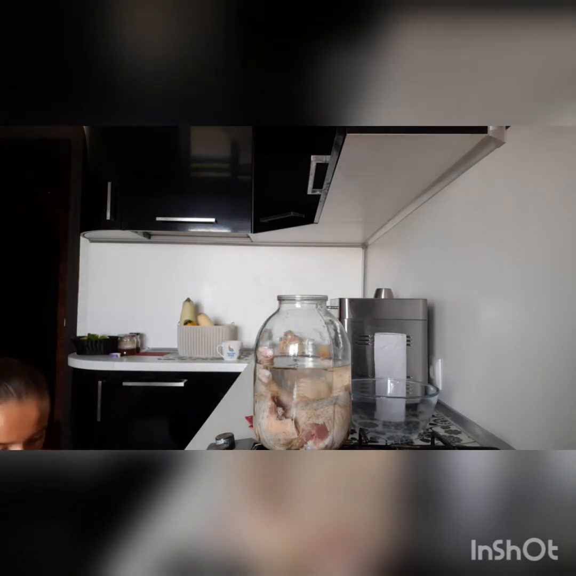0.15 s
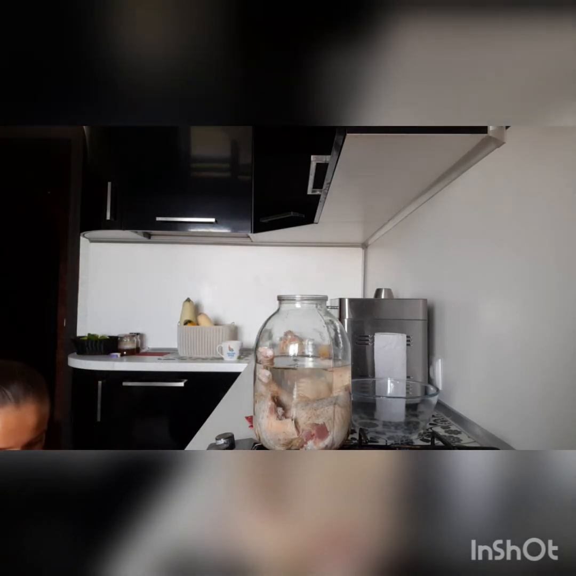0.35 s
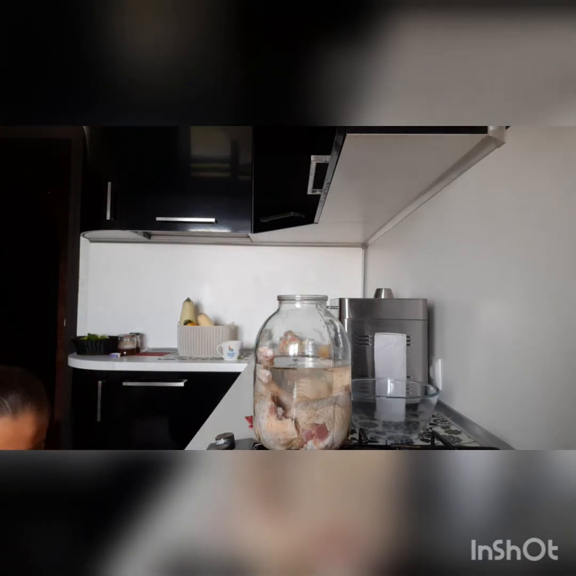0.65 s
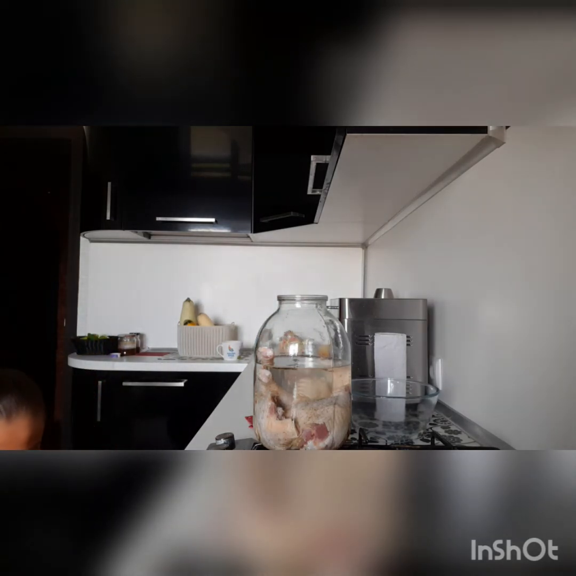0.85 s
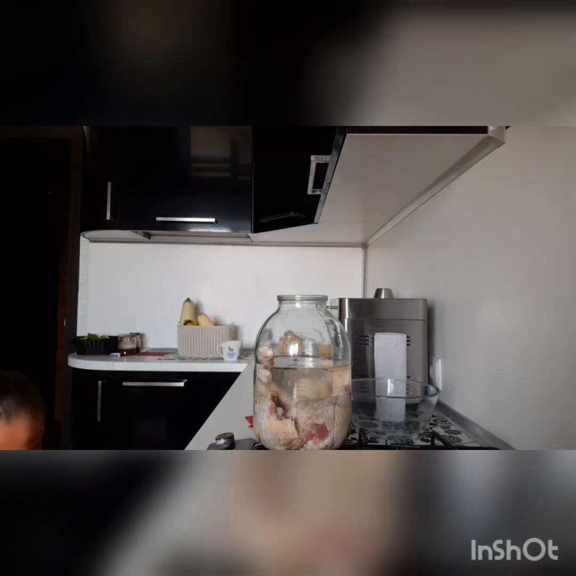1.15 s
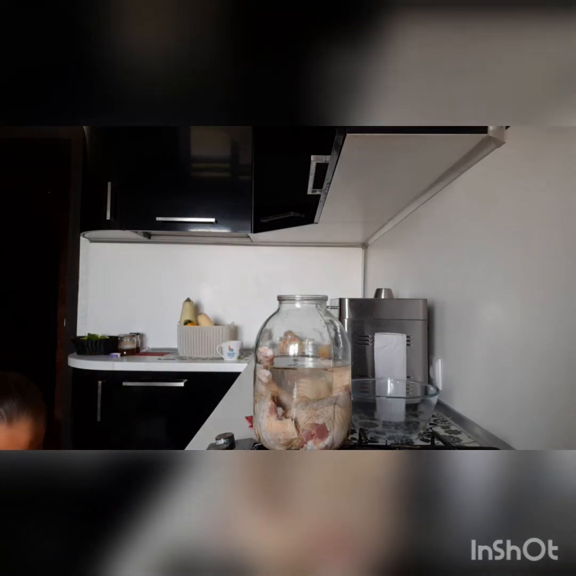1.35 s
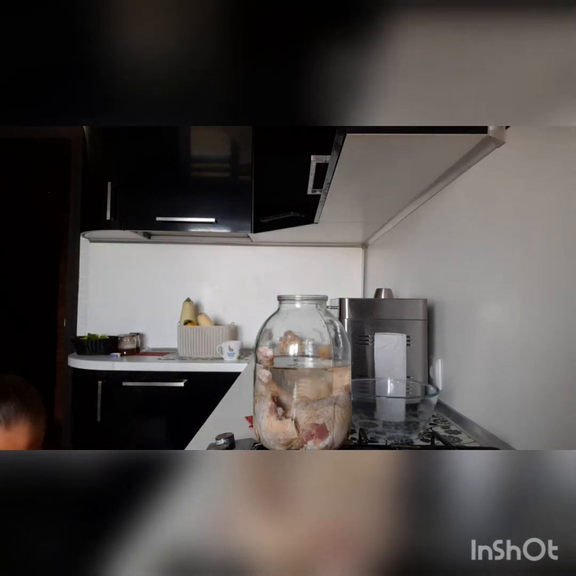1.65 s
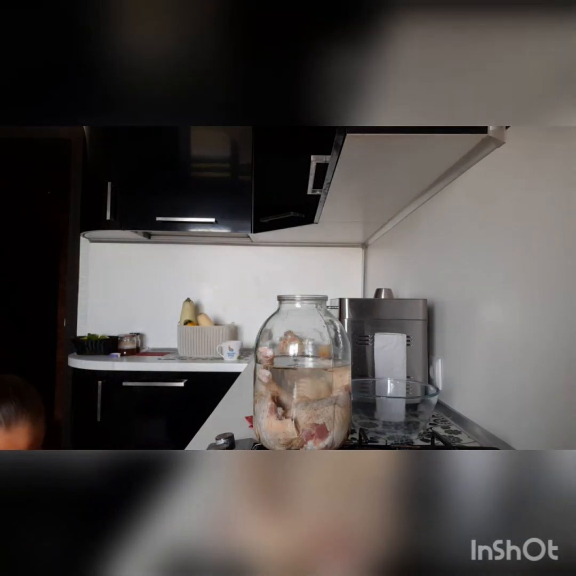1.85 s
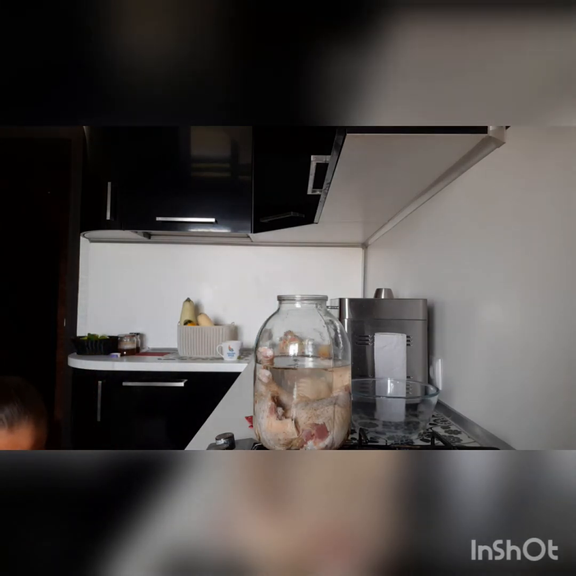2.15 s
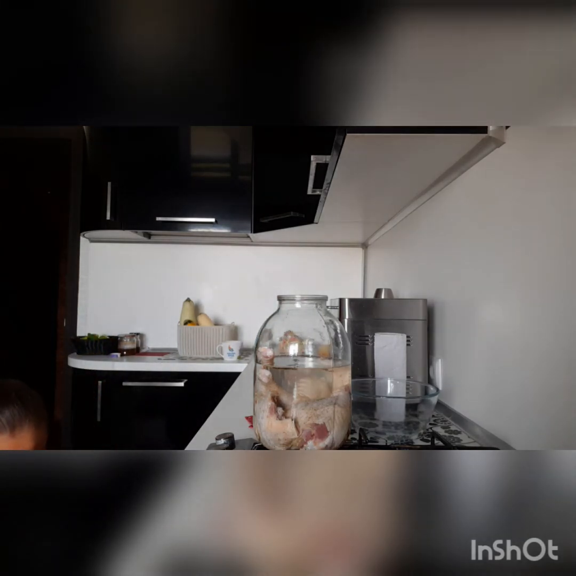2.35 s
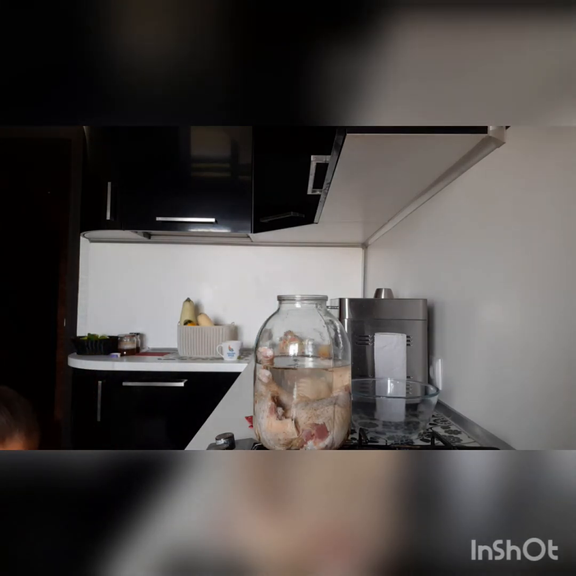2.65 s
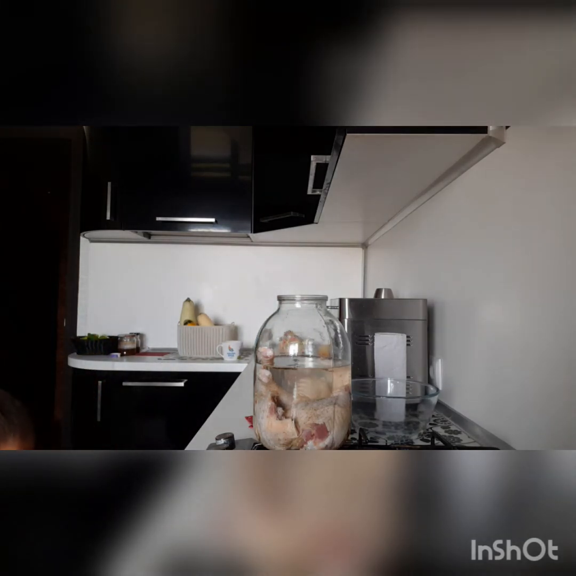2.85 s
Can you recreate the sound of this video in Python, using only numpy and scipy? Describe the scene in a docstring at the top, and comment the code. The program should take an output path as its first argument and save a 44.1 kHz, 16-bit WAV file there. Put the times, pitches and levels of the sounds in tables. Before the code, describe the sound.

A metal oven rack scrapes along its rails and clanks home inside a sheet-metal oven

```python
"""A small kitchen, heard from across the room on two microphones: a wire rack in a sheet-metal oven.
The rack is dragged along its rails, knocked and pushed home; friction ticks and clanks ring wires and panels.
Shaking and jolts boom in the casing, single tones sing out, and something brushes lightly.
Dense noise echoes give the room; banded noise, an appliance's mains hum and faint tones lie beneath."""
import sys
import numpy as np
from scipy import signal
from scipy.io import wavfile

SR = 44100
rng = np.random.default_rng(int(sys.argv[2]) if len(sys.argv) > 2 else 0)


def persist_wave(psi):
    """Save psi, clipped to +-1, as 16-bit WAV."""
    counts = np.round(np.clip(psi, -1, 1) * 32767).astype(np.int16)
    wavfile.write(sys.argv[1], SR, np.atleast_2d(counts).T)


def invert_db(level):
    """Linear amplitude ratio for a level in decibels (20 dB per decade), elementwise."""
    return 10 ** (np.asarray(level, dtype=float) / 20)


N = 132300

LEFT_BASS_DB, RIGHT_BASS_DB = -2.5, 0.57   # gain of the hum and the casing's boom on each side


def rms_one(x):
    """Scale to rms 1."""
    return x / np.sqrt(np.mean(x ** 2) + 1e-20)


def in_time(tables):
    """Join the strokes into sample-rate columns; the level rests between distant strokes."""
    rest_db, fade_s = -100, 0.03
    rows = []
    for table in tables:
        if rows and table[0][0] - rows[-1][0] > 2 * fade_s:
            rows.append((rows[-1][0] + fade_s, rest_db, *rows[-1][2:]))
            rows.append((table[0][0] - fade_s, rest_db, *table[0][2:]))
        rows += list(table)
    s, *columns = np.transpose(sorted(rows))
    return [np.interp(np.arange(N) / SR, s, c) for c in columns]


def at_hz(points, hz):
    """Read a spectrum table, evenly in log frequency."""
    table_hz, values = np.transpose(points)
    return np.interp(np.log(hz), np.log(table_hz), values)


def drift(rate):
    """Slow random wandering of spread 1, made at a twentieth of the sample rate; rate in Hz."""
    r = np.exp(-40 * np.pi * rate / SR)
    noise = rng.standard_normal(N // 20 + 4002)
    slow = signal.lfilter([1], [1, -2 * r, r * r], noise)[4000:]   # drop the filter's start
    return np.interp(np.arange(N) / 20, np.arange(len(slow)), rms_one(slow - slow.mean()))


def ring(force, hz, t60):
    """A damped resonance: a unit click sets a sine of height 1 ringing."""
    r, w = invert_db(-60 / (t60 * SR)), 2 * np.pi * hz / SR
    return signal.lfilter([0, np.sin(w)], [1, -2 * r * np.cos(w), r * r], force + 1e-18)


def driven(force, hz, t60):
    """A mode scaled so that white force of rms 1 gives rms 1."""
    return ring(force, hz, t60) * np.sqrt(4 * np.log(1000) / (t60 * SR))


def narrow(hz, width_hz):
    """Noise through one resonance, rms 1."""
    return rms_one(ring(rng.standard_normal(N), hz, np.log(1000) / (np.pi * width_hz)))


# Spectrum of the quiet kitchen. Each row: frequency in Hz, relative density in dB per Hz.
ROOM_SPECTRUM = [(30, -12), (70, -7), (103, -17), (140, -17.5), (227, -23), (300, -25.5), (420, -38),
                 (570, -30.5), (1070, -26.5), (1670, -31), (2100, -48), (4000, -54.5), (8000, -64.5),
                 (13000, -59.5), (16000, -45)]
# How alike the two microphones hear it. Each row: frequency in Hz, left-right correlation from -1 to 1.
ROOM_LIKENESS = [(60, 1), (250, 0.046), (600, 0.8), (1200, -0.54), (3000, -0.0073)]
# Faint fitful tones. Each row: frequency in Hz, width in Hz, middle level in dB.
FAINT_TONES = [(218, 45, -68), (282, 4.6, -74), (568, 41, -75), (1028, 65, -73.5), (1616, 25, -81)]


def room_tone():
    """Narrow bands of stereo noise, a wavering mains hum and faint tones that come and go."""
    air = 0
    edges = 28 * 2 ** np.arange(0, 9.3, 0.4)   # band edges in Hz
    white = rng.standard_normal((2, 2, N))     # neighbouring bands use different noise
    for k, (low, high) in enumerate(zip(edges, edges[1:])):
        band = signal.butter(2, [low, high], "band", fs=SR, output="sos")
        mid, side = signal.sosfilt(band, white[k % 2])
        hz = np.sqrt(low * high)
        alike = np.clip(at_hz(ROOM_LIKENESS, hz), -1, 1)
        stereo = np.sqrt(1 + alike) * mid + np.sqrt(1 - alike) * side * [[1], [-1]]
        air = air + invert_db(at_hz(ROOM_SPECTRUM, hz) + 1.5 * drift(6.2)) * stereo
    hum_level = np.sqrt(2) * invert_db(-52 + 1.8 * drift(4.9))
    hum = hum_level * np.sin(2 * np.pi * 100.3 * np.arange(N) / SR + 0.12 * drift(7.1))
    faint = sum(invert_db(db + 2.5 * drift(5)) * narrow(hz, w) for hz, w, db in FAINT_TONES)
    return invert_db(-56.5) * rms_one(air) + hum * invert_db([[LEFT_BASS_DB], [RIGHT_BASS_DB]]) + faint


def ticks():
    """Stick and slip: dense uneven ticks in judders, rms 1."""
    ticks_per_s, spread_db, judder_db, judder_hz = 1200, 4.0, 3.0, 45
    born = rng.random(N) < ticks_per_s / SR
    uneven_db = spread_db * np.minimum(rng.exponential(1, N), 5)
    sizes = invert_db(uneven_db + judder_db * drift(judder_hz))
    return rms_one(born * sizes * rng.choice([-1, 1], N))


# Modes of the oven's sheet panels. Each row: frequency in Hz, relative level in dB, t60 in s.
PANEL_MODES = [(392.6, 4.5, 0.39), (500.5, 4.5, 0.21), (565.3, 9, 0.14), (662, 9.5, 0.16), (759, 0.5, 0.15),
               (834.8, 10.5, 0.13)]
# Modes of the rack's wires. Each row: frequency in Hz, relative level in dB, t60 in s.
WIRE_MODES = [(1097, 8.5, 0.11), (1544, 7, .05), (2025, -4, 0.06), (2410, -3, 0.073), (3370, 2.5, 0.12),
              (3610, -7.5, 0.099), (4150, -3, 0.1), (4650, 0.5, 0.25), (5310, -6.5, 0.6), (5960, -3, 0.4),
              (7100, -13, 0.4), (11640, -2.5, 0.032)]
# Spectrum of the crowd of small modes. Each row: frequency in Hz, relative density in dB per Hz.
SMALL_MODES = [(320, -21.5), (450, -17.5), (700, 0), (980, -9), (1330, -11.5), (2500, -11.5), (4570, -9.5),
               (6500, -13.5), (8850, -17.5), (11600, -12.5), (14000, -19), (16000, -22.5)]


def rack_modes():
    """Named modes whose drive drifts as the contact shifts, then a crowd of small, short ones."""
    modes = []
    for hz, db, t60 in PANEL_MODES + WIRE_MODES:
        contact_shift_db = 3.0 * drift(6)[::32]
        modes.append((hz, db - 18.5 + contact_shift_db, t60))
    crowd = np.geomspace(330, 15800, num=90)
    crowd_db = at_hz(SMALL_MODES, crowd) + 10 * np.log10(crowd)   # spacing widens with frequency
    for hz, db in zip(crowd, crowd_db):
        modes.append((hz, -10 + db - crowd_db.max(), 0.012 * (3000 / hz) ** 0.63))
    return modes


# Strokes of the rack along its rails. Each row: time in seconds, scrape in dB,
# sizzle of the treble in dB re scrape, rattle of the panels in dB re scrape.
RAIL_DRAGS = [
    [(0.0, -68, -5.5, 2), (0.084, -83, 2, 4), (0.118, -40, -7, 0.5), (0.158, -36, -3.5, 1),
     (0.184, -36.5, -5, -5), (0.25, -45, -8.5, -2), (0.33, -44, -7, 0.5), (0.372, -41.5, -8.5, -7.5),
     (0.516, -75.5, -9.5, 2), (0.66, -78, -18, 6)],
    [(1.39, -99.5, -13, -7.5), (1.412, -86, 2.5, -5), (1.426, -53.5, -15, 1.5), (1.454, -28, -16.5, -0.5),
     (1.478, -33.5, -10, -2.5), (1.624, -59.5, -12, -3.5), (1.64, -31, -1.5, 2.5),
     (1.682, -35, -5.5, -10.5), (1.83, -64, -4, 11)],
    [(1.83, -69, -7, 3), (1.86, -42, -1.5, -0.5), (1.916, -38, -6, -7), (1.976, -52.5, 0, 0.5),
     (2.002, -42, 3, 0), (2.03, -38.5, -5.5, -7), (2.098, -47, -3.5, -0.5), (2.224, -49, -19.5, -2.5),
     (2.396, -57.5, -9, -2), (2.48, -67.5, -15, 0.5)],
    [(2.48, -85, -19, 4.5), (2.578, -62, -22.5, 1.5), (2.626, -76.5, -22, -7), (2.688, -55.5, -20, -1),
     (2.796, -78, -19, 0), (2.828, -62, -43, 4.5), (2.906, -81.5, -10, -28), (2.922, -75, -10, 14),
     (2.956, -70.5, -4.5, -2), (3.0, -57, -12, -10)],
]


def rack():
    """Friction ticks and clanks ring the modes of wires and panels, shared among four corners."""
    rattle_hz, scrape_hz, sizzle_hz = 676, 1900, 10200   # where the three drag levels act in full
    scrape_db, sizzle_db, rattle_db = (c[::32] for c in in_time(RAIL_DRAGS))
    rubs = [ticks(), ticks(), ticks()]
    corners = np.zeros((4, N))
    for k, (hz, db, t60) in enumerate(rack_modes()):
        low = at_hz([(rattle_hz, 1), (scrape_hz, 0)], hz)
        high = at_hz([(scrape_hz, 0), (sizzle_hz, 1)], hz)
        drag_db = db + scrape_db + low * rattle_db + high * sizzle_db
        force = rubs[k % 3] * np.repeat(invert_db(drag_db), 32)[:N]
        force += clanks(hz, np.mean(db))
        corners[k % 4] += driven(force, hz, t60)
    return corners


# Shaking of the casing, in bouts. Each row: time in seconds, force in dB.
CASING_SHAKES = [
    [(0.07, -58), (0.136, -34.5), (0.29, -41), (0.334, -37), (0.518, -61), (0.56, -64)],
    [(1.41, -67), (1.452, -39.5), (1.506, -52), (1.548, -48), (1.604, -48), (1.625, -59)],
    [(1.632, -33), (1.64, -34), (1.692, -32), (1.744, -38.5), (1.83, -57)],
    [(1.83, -41.5), (1.874, -36), (1.92, -41), (1.96, -38.5), (2.228, -40), (2.5, -56)],
    [(2.5, -53.5), (2.554, -50), (2.662, -58), (2.774, -51.5), (2.796, -59.5), (3.0, -60)],
]
# Modes of the casing. Each row: frequency in Hz, relative level in dB, t60 in s.
CASING_MODES = [(88, -13, 0.17), (124, -8, 0.19), (168.3, -4.5, 0.069), (187.3, -6, 0.075),
                (235.5, -9, 0.078), (266, -9.5, 0.097)]
# Jolts of the casing. Each row: start in seconds, length in s, settled pitch in Hz, level in dB before the mix.
CASING_JOLTS = [(0.135, 0.051, 82.6, -27.5), (0.213, 0.017, 84, -29), (0.274, 0.011, 87, -27),
                (0.359, 0.053, 76, -37.5), (1.453, 0.048, 124, -33.5), (1.632, 0.034, 120, -18),
                (1.633, 0.018, 241.6, -26.5), (1.66, 0.044, 182.7, -27.5), (1.725, 0.028, 111.1, -28),
                (1.796, 0.012, 103, -34.5), (1.876, 0.033, 116.6, -23.5), (1.981, 0.026, 104, -28),
                (2.038, 0.069, 80.2, -34), (2.122, 0.045, 98.6, -35), (2.212, 0.013, 95.5, -28.5),
                (2.264, 0.018, 91, -33.5), (2.584, 0.016, 88, -38), (2.627, 0.0088, 87, -38.5),
                (2.741, 0.0098, 92.8, -42), (2.822, 0.03, 90, -43), (2.886, 0.01, 90.8, -38),
                (2.926, 0.022, 90, -43), (2.971, 0.022, 88, -44.5)]


def casing():
    """Shaking rings the casing modes; each jolt starts sharp, settles on one pitch and dies fast."""
    rise_s, t60_s, sharp_share, settle_s = 0.0078, 0.078, 0.22, 0.015
    shake_db, = in_time(CASING_SHAKES)
    boom = np.zeros(N)
    for hz, db, t60 in CASING_MODES:
        boom += driven(invert_db(db + shake_db) * rng.standard_normal(N), hz, t60)
    for s, length, hz, db in CASING_JOLTS:
        start = int(s * SR)
        t = np.arange(N - start) / SR
        rise = 1 - np.exp(-(t / rise_s) ** 2)
        fall = invert_db(db - 60 * np.maximum(t - length, 0) / t60_s)
        cycles = hz * (t - sharp_share * settle_s * np.exp(-t / settle_s)) + rng.random()
        boom[start:] += rise * fall * np.sin(2 * np.pi * cycles)
    return boom


# One tone stands out for a moment, mostly a wire or panel singing.
# Each row: start in seconds, length in s, frequency in Hz, width in Hz, level in dB before the mix.
SINGING_TONES = [(0.108, 0.04, 3400, 200, -38), (0.117, 0.021, 3850, 420, -34),
                 (0.711, 0.062, 1900, 32, -66.5), (0.299, 0.018, 6000, 72, -50),
                 (0.35, 0.032, 5310, 56, -44), (0.16, 0.038, 1110, 45, -39), (0.35, 0.032, 1130, 41, -41),
                 (1.632, 0.073, 556, 22, -35), (0.82, 0.072, 560, 37.7, -65),
                 (1.437, 0.11, 875, 18.3, -34.5), (1.48, .035, 393, 12.3, -34),
                 (1.58, 0.034, 410, 12.3, -41), (2.6, 0.12, 2040, 61, -61), (1.672, 0.011, 2720, 103, -33),
                 (1.453, 0.05, 710, 22.3, -39), (2.951, 0.044, 655, 30, -53.5)]


def sings():
    """Each singing moment is a tone whose phase wanders, quick to start, rounded off."""
    out = 0
    for s, length, hz, width_hz, db in SINGING_TONES:
        t = np.arange(N) / SR - s
        wander = np.sqrt(2 * np.pi * width_hz / SR) * np.cumsum(rng.standard_normal(N))
        shape = np.clip(t / 0.003, 0, 1) * np.exp(-(np.maximum(t, 0) / length) ** 4)
        out = out + invert_db(db) * shape * np.sin(2 * np.pi * hz * t + wander)
    return out


# Wire knocks on rail. Each row: start in seconds, relative level in dB, dullness in dB per octave.
RAIL_CLANKS = [(0.11, -37, 0.5), (0.33, -28, -0.5), (1.423, -38.5, 5), (1.445, -27.5, 0),
               (1.634, -17.5, 2.5), (1.843, -33.5, -1), (1.986, -30.5, 4.5), (2.67, -55, 3)]


def clanks(hz, mode_db):
    """Force of the knocks on one mode: 10 ms noise bursts, swelling for 2.4 ms and fading."""
    contact = np.arange(441) / SR / 0.0024
    force = np.zeros(N)
    for s, level_db, dull_db in RAIL_CLANKS:
        start = int(s * SR)
        gain = invert_db(mode_db + level_db - 2.5 - dull_db * np.log2(hz / 2000))
        burst = contact * np.exp(-contact) * rng.standard_normal(len(contact))
        force[start:start + len(contact)] += gain * burst
    return force


# Colour of the light brush. Each row: frequency in Hz, width in Hz, relative level in dB.
BRUSH_BANDS = [(1859.7, 170, -0.5), (2395, 200, -12.5), (13570, 2000, -11.5)]


def brush():
    """Something brushes lightly: a short soft rustle of narrow noises with a quick start."""
    start_s, length_s, level_db = 1.113, 0.096, -66.5   # level before the mix
    t = np.arange(N) / SR - start_s
    shape = np.clip(t / 0.0045, 0, 1) * np.exp(-(np.maximum(t, 0) / length_s) ** 2)
    return shape * sum(invert_db(level_db + db) * narrow(hz, w) for hz, w, db in BRUSH_BANDS)


def kitchen(x):
    """Dense dying reflections, the treble dying twice as fast; both sides hear the same bass."""
    t60_s, wall_cut_hz, first_echo_s, alike_below_hz = 0.27, 6300, 0.0013, 330
    t = np.arange(SR // 2) / SR
    shared, apart = rng.standard_normal((2, len(t)))
    apart = signal.sosfilt(signal.butter(2, alike_below_hz, "high", fs=SR, output="sos"), apart)
    echoes = (shared + apart * [[1], [-1]]) * (t > first_echo_s)
    low = signal.lfilter(*signal.butter(1, wall_cut_hz, fs=SR), echoes)
    fall = invert_db(-60 * t / t60_s)
    tail = low * fall + (echoes - low) * fall ** 2
    tail = tail / np.sqrt(np.sum(tail ** 2, axis=1, keepdims=True))
    return signal.fftconvolve(x[None], tail, axes=1)[:, :N]


# The left microphone's lead over the right, in seconds, for each of the rack's four corners.
CORNER_LEADS = [0.000459, 0.000385, .00034, 0.000287]


def scene():
    """Each corner reaches the left microphone first, with its own echoes; the boom is stronger on the right."""
    corners = rack() + (sings() + brush()) / 2
    boom = casing()
    n = np.arange(N)
    left = corners.sum(axis=0)
    right = sum(np.interp(n - lead * SR, n, c) for lead, c in zip(CORNER_LEADS, corners))
    wet = sum(kitchen(c + invert_db(-21) * boom) for c in corners)
    oven = invert_db(-3.5) * np.array([left, right]) + invert_db(-1) * wet
    return oven + boom * invert_db([[LEFT_BASS_DB], [RIGHT_BASS_DB]]) + room_tone()


def top_cut(x):
    """Nothing passes above the cut-off."""
    return signal.sosfilt(signal.butter(12, 16960, fs=SR, output="sos"), x)


def record(dry):
    """The microphones lose the deep bass and the very top."""
    no_rumble = signal.sosfilt(signal.butter(6, 47.7, "high", fs=SR, output="sos"), dry)
    mix = signal.sosfilt(signal.cheby2(14, 60, 16280, fs=SR, output="sos"), no_rumble)
    return top_cut(mix)


dry = scene()
out = record(dry)
persist_wave(out)
```